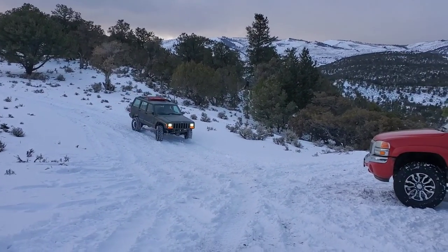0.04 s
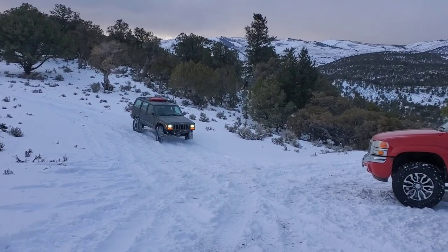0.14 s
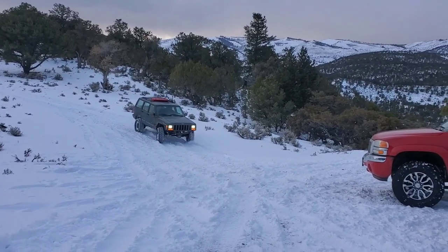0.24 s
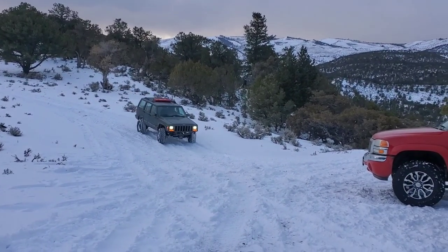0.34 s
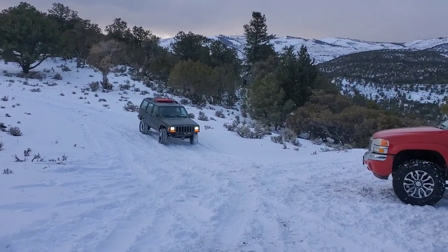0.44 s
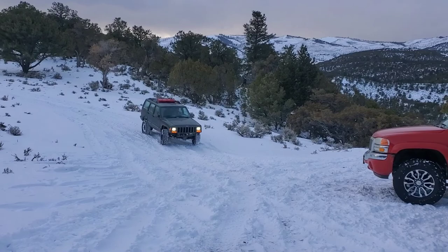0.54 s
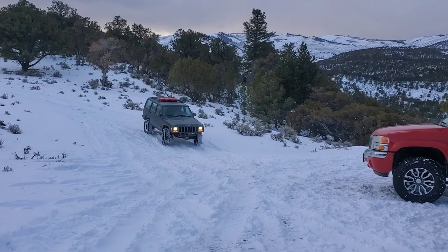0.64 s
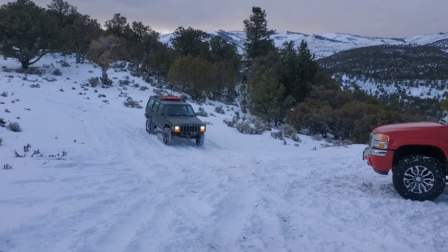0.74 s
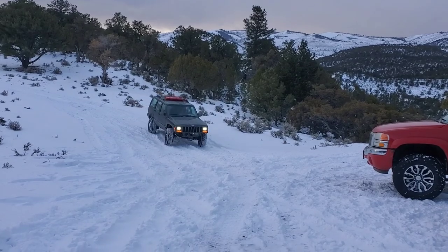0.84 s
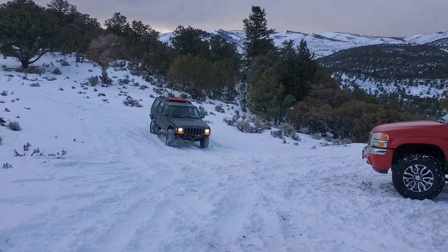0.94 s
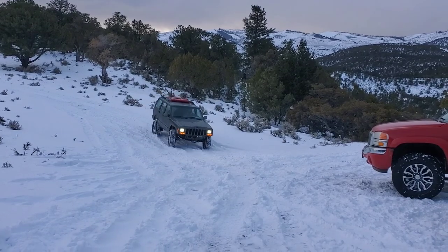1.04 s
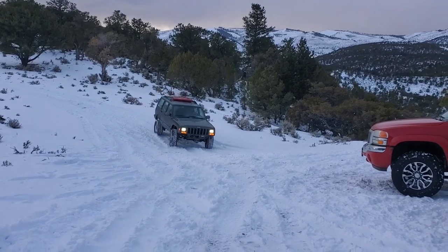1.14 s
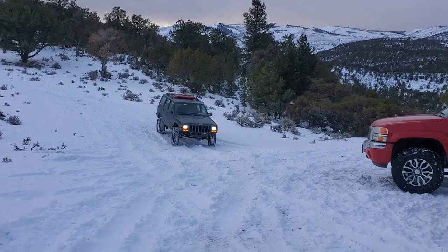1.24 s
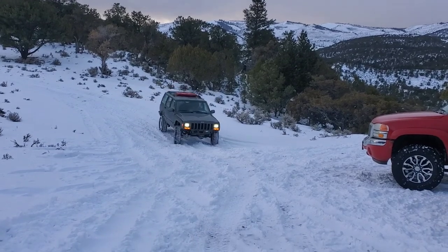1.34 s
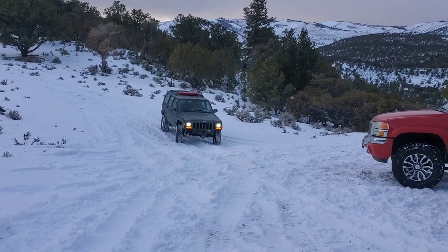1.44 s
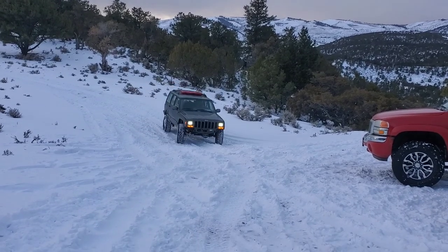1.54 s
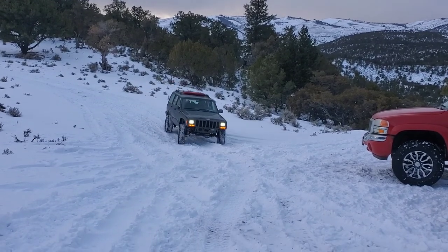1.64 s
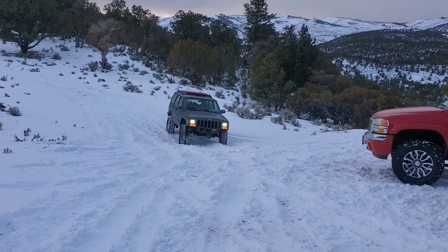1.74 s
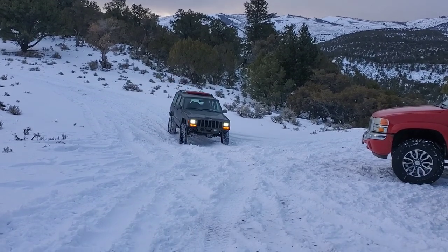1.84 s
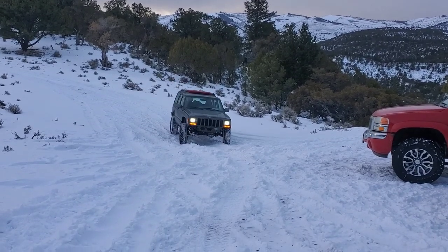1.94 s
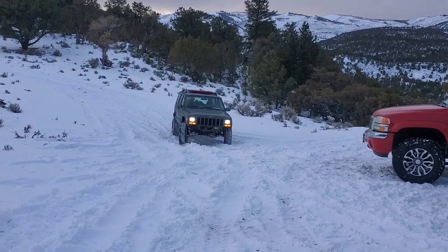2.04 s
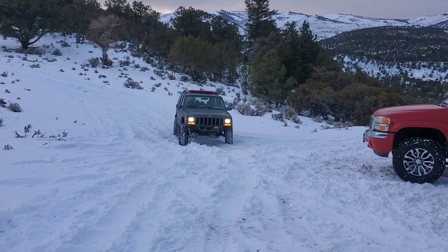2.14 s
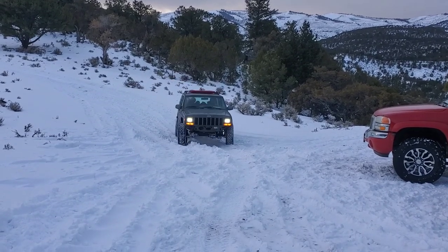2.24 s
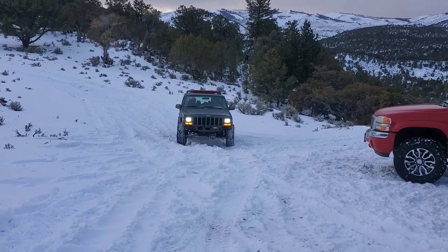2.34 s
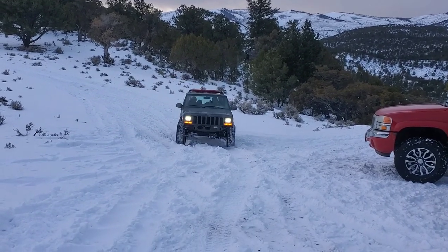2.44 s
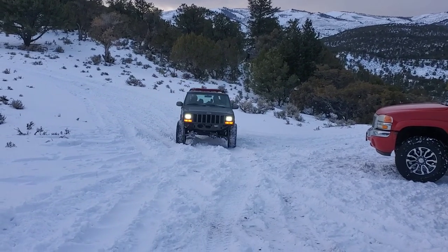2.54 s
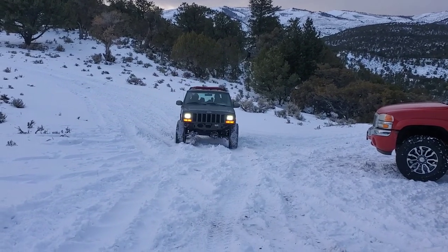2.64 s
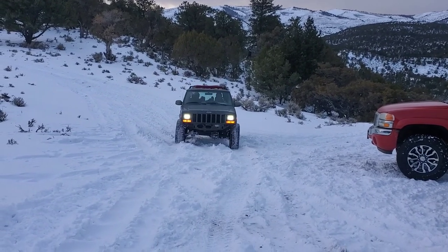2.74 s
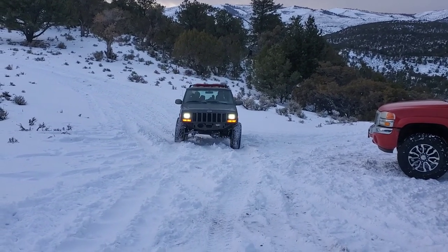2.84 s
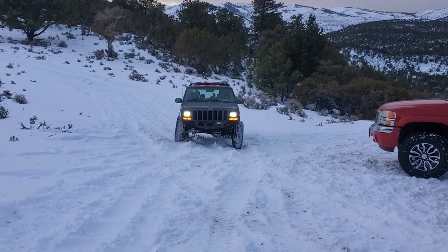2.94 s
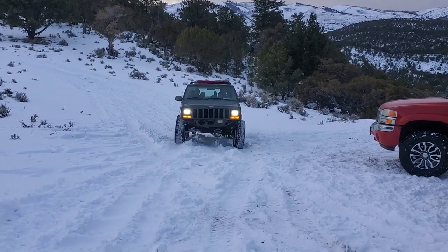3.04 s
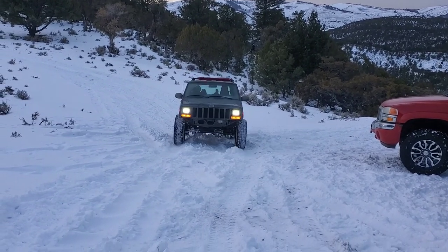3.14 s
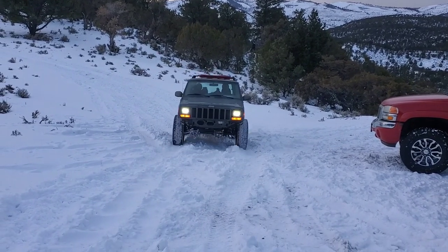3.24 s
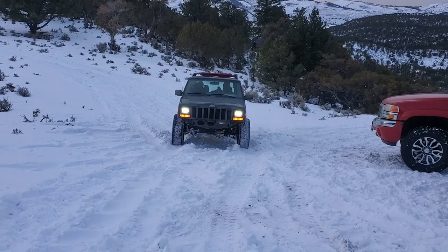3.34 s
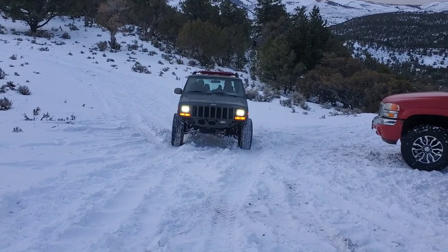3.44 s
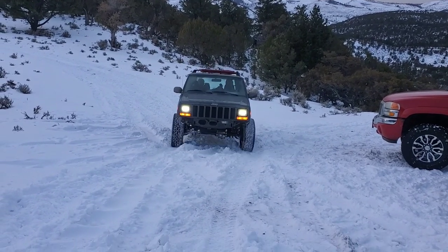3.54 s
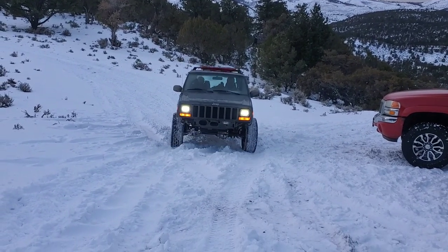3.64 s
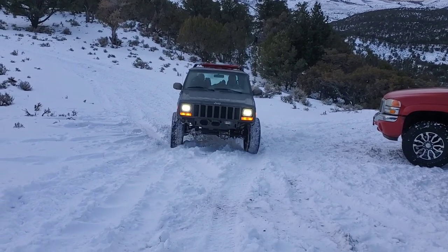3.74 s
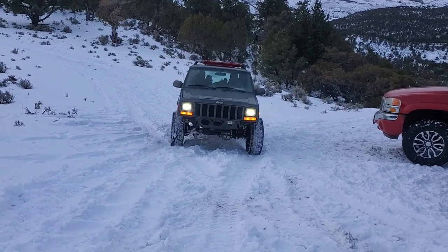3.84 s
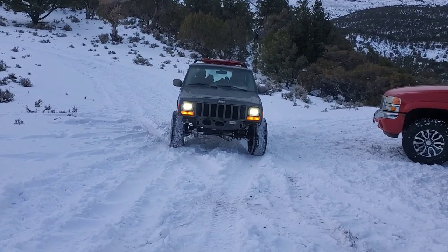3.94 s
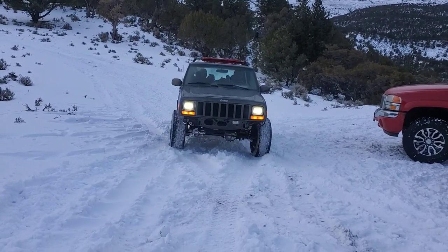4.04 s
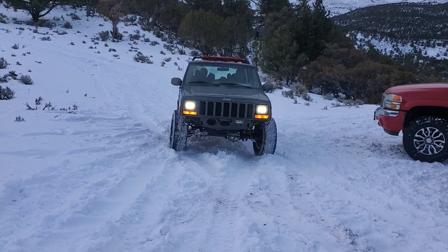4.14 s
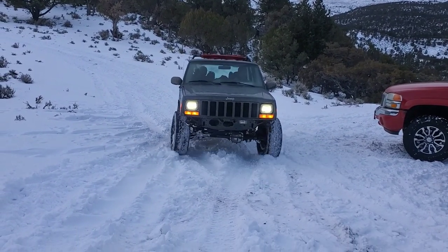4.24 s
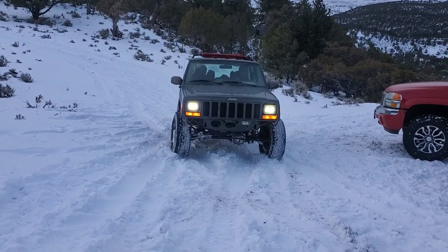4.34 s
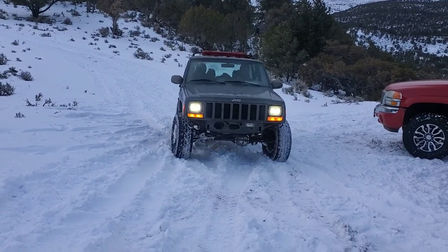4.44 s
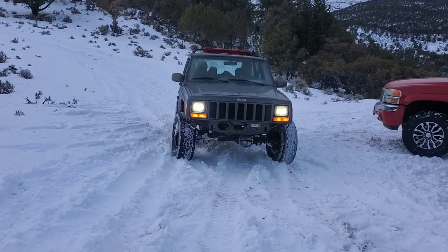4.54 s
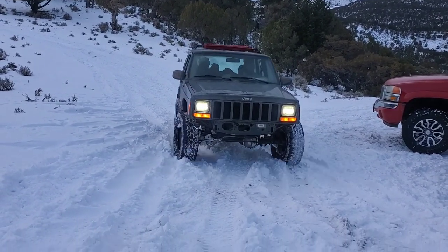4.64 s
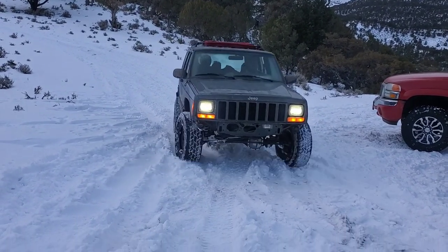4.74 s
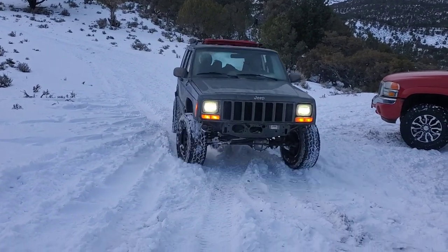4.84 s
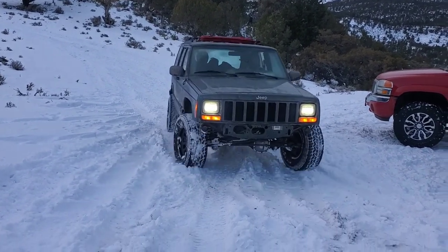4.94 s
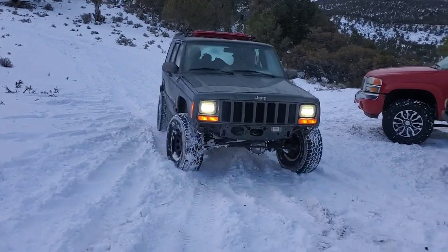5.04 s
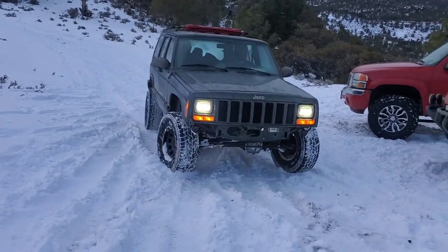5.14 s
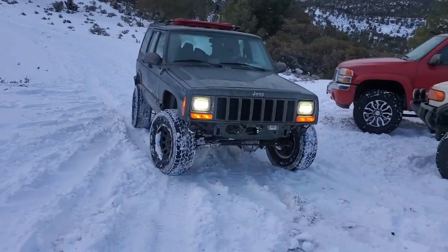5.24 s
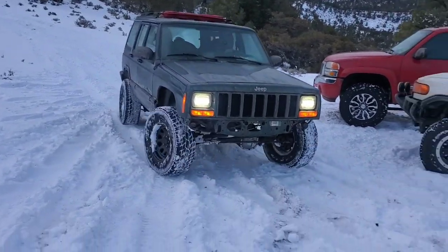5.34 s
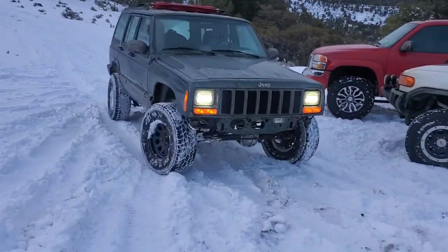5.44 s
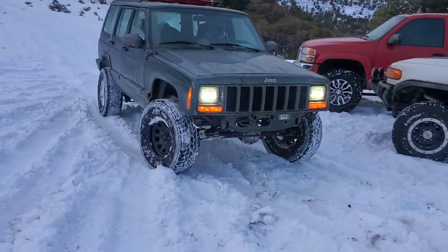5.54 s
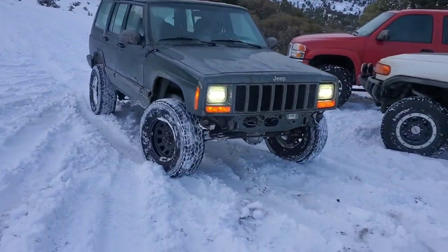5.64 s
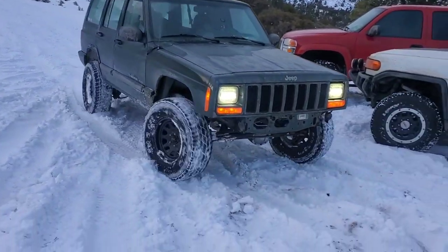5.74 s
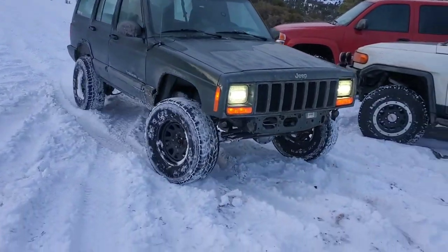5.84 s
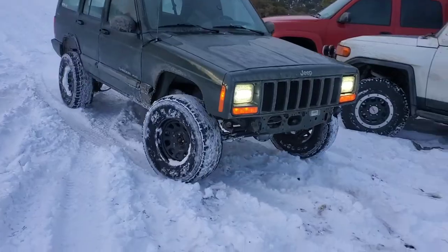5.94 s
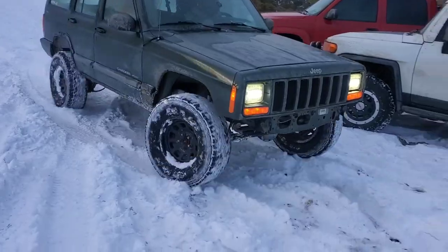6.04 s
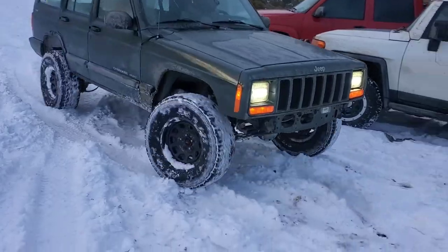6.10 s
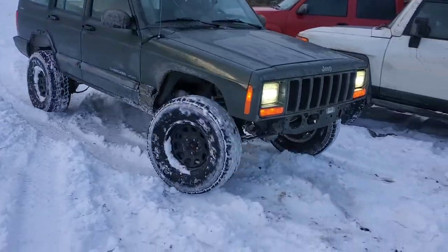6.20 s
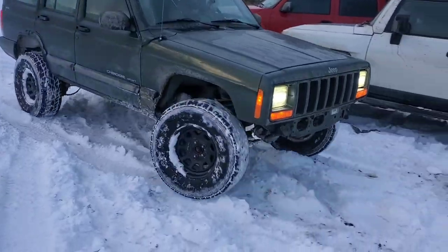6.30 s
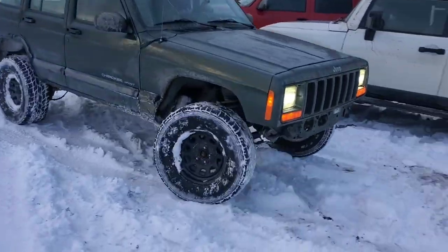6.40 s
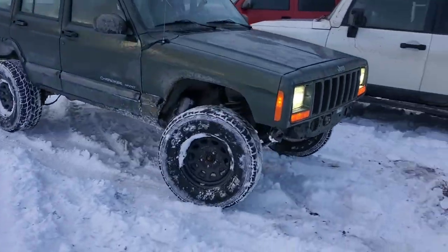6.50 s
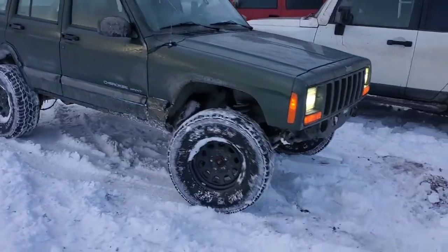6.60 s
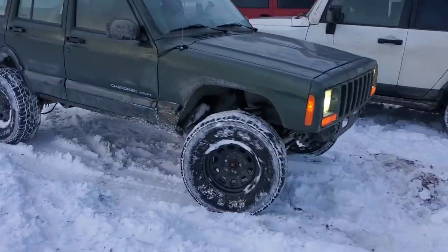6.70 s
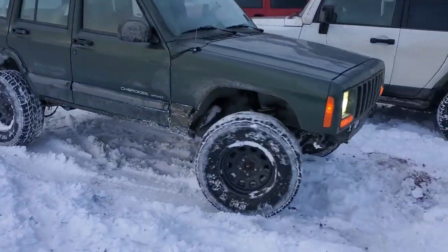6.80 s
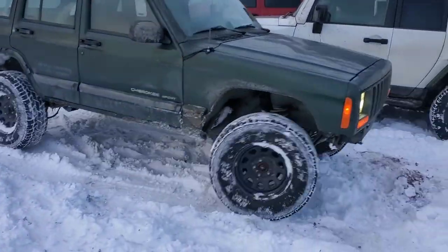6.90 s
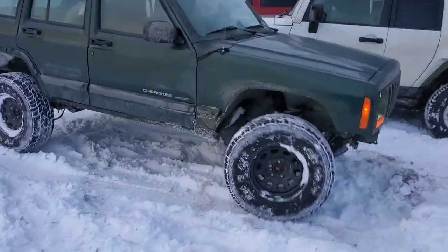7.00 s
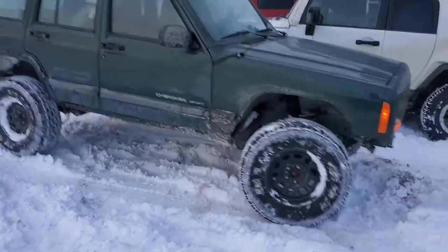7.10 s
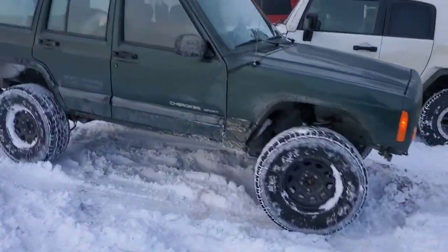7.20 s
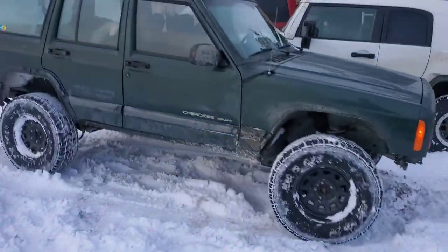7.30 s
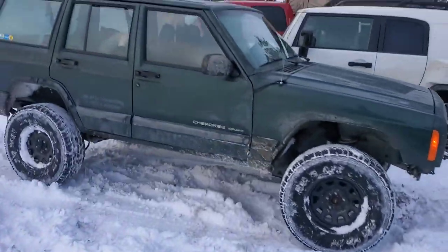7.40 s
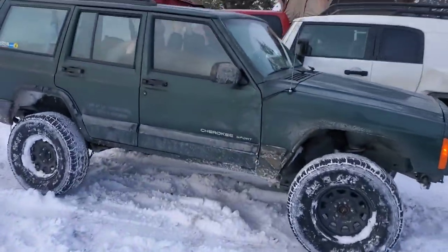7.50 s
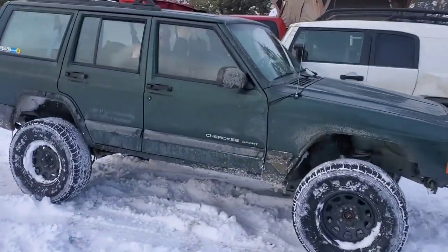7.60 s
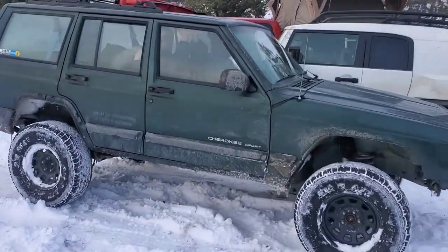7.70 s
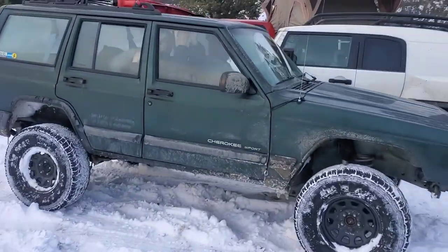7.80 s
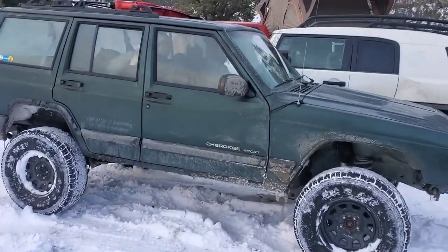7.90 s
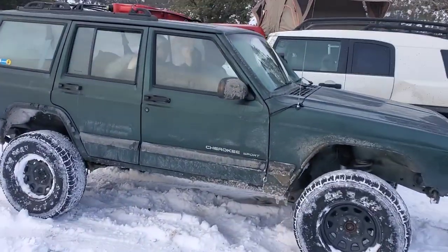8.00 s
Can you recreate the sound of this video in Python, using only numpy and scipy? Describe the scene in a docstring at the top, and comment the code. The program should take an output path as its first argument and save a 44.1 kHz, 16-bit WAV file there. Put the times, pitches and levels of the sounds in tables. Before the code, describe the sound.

A lumpy six-cylinder exhaust booms closer over fizzing snow, fan rushing, then drops abruptly to a low loping idle amid close crunches and dry pops.

```python
"""An exhaust booms and lopes as a six-cylinder four-wheel-drive crawls nearer, then drops to idle passing by.
Its note is a few harmonics of the firing rate; uneven firings ring the exhaust pipe as filtered pulses.
Filtered noise makes the rushing fan, hollow roar and light wind; random clicks on metal resonances tick.
Snow fizzes and packs as shaped noise and clicks; close dull crunches, a knock and dry pops, made of
ringing bursts, sit mostly close to one microphone port. Faint squeaks, a tick and thin whines ring too."""
import sys
import numpy as np
from scipy import signal
from scipy.fft import rfft, irfft
from scipy.io import wavfile

SR = 44100
rng = np.random.default_rng(int(sys.argv[2]) if len(sys.argv) > 2 else 0)


def master(y):
    """Save y as 16-bit WAV."""
    cut = np.clip(np.atleast_2d(y).T, -1, 1)
    pcm = np.round(cut * 32767)  # scale
    wavfile.write(sys.argv[1], SR, pcm.astype(np.int16))


N = 355446
TIME = np.arange(N) / SR

# engine speed: time_s, firings_per_s
ENGINE_SPEED = [(0.0, 69.0), (0.25, 70.7), (0.65, 63.0), (1.05, 73.5), (1.66, 76.0), (2.18, 85.7),
                (2.62, 84.3), (2.85, 77.9), (3.1, 83.7), (3.39, 72.4), (3.7, 67.2), (3.88, 67.4),
                (4.18, 59.4), (4.71, 65.5), (5.12, 63.5), (5.55, 67.5), (5.68, 63.4), (5.95, 47.2),
                (6.08, 42.8), (6.28, 37.8), (6.4, 37.3), (7.21, 37.6), (7.74, 34.6), (8.06, 35.9)]
CRUISE_HZ = 65  # firings per second at cruising speed


def gain_of(db):
    """Turns decibels into amplitude."""
    return 10 ** (np.asarray(db) / 20)


def evened(x):
    """Scales a sound to rms 1."""
    return x / np.sqrt(np.mean(x ** 2) + 1e-20)


def curve(rows, axis=1):
    """Joins one column of a table by straight lines in time."""
    columns = np.transpose(rows)
    return np.interp(TIME, columns[0], columns[axis])


def read(points, hz):
    """Reads a table along a logarithmic frequency axis."""
    f, value = np.transpose(points)
    return np.interp(np.log(hz + 1), np.log(f), value)


def coloured(x, points, size=8192):
    """Gives a sound the listed spectrum with a minimum-phase filter; the result has rms 1."""
    hz = abs(np.fft.fftfreq(size, 1 / SR))
    log_gain = np.log(gain_of(read(points, hz)))
    spectrum = np.exp(np.conj(signal.hilbert(log_gain)))
    response = np.fft.ifft(spectrum).real[:size // 2]
    return evened(signal.oaconvolve(np.atleast_2d(x), response[None], axes=1)[:, :N])


def drift(hz):
    """Makes a random wandering, mostly slower than the given rate, with rms 1."""
    f = np.fft.rfftfreq(N, 1 / SR)
    smoothed = rfft(rng.standard_normal(N)) * np.exp(-(f / hz) ** 2)
    return evened(irfft(smoothed, N))


def noise():
    """Makes two unrelated channels of white noise."""
    return rng.standard_normal((2, N))


def spread(pair):
    """Mixes two unrelated signals into left and right ports: alike in the bass, apart in the treble."""
    # likeness of the two microphone ports: pitch_hz, coherence_0_to_1
    likeness = [(100, .94), (600, .95), (1200, .92), (2200, .72), (4000, .5), (8000, .1)]
    # how far the left port leads the right: pitch_hz, lead_radians
    left_lead = [(150, 0.52), (550, 0.33), (1200, 1.2), (4000, 1.48)]
    (a, b), hz = rfft(pair), np.fft.rfftfreq(N, 1 / SR)
    same = np.clip(read(likeness, hz), 0, 1)
    mid = a * np.sqrt((1 + same) / 2)
    side = b * np.sqrt((1 - same) / 2)
    turn = np.exp(.5j * read(left_lead, hz))
    return irfft(np.array([(mid + side) * turn, (mid - side) / turn]), N)


def grains(per_s, scatter_db):
    """Makes two trains of randomly timed clicks with scattered sizes and either sign."""
    sizes = gain_of(scatter_db * np.minimum(rng.exponential(1, (2, N)), 4))
    signs = rng.choice([-1, 1], (2, N))
    struck = rng.random((2, N)) < per_s / SR
    return evened(sizes * signs * struck)


def swells(rows, order=2):
    """Adds swells (time_s, half_length_s, level_db) as amplitude; a higher order has steeper edges."""
    return sum(gain_of(db) * np.exp(-abs((TIME - s) / half) ** order) for s, half, db in rows)


def resonance(x, hz, width_hz):
    """Rings one narrow band, with gain 1 at its centre."""
    return signal.lfilter(*signal.iirpeak(hz, hz / width_hz, SR), x)


def panned(db):
    """Gives both ports' gains for a left-minus-right level; the nearer port keeps gain 1."""
    return gain_of([[min(db, 0)], [min(-db, 0)]])


def slowing():
    """Counts the octaves by which the engine runs below cruising speed."""
    return np.log2(CRUISE_HZ / curve(ENGINE_SPEED))


def firing():
    """Swings between -1 and 1 once per firing."""
    return np.cos(2 * np.pi * np.cumsum(curve(ENGINE_SPEED)) / SR)


def wind(gust_db=2):
    """Buffets the two microphone ports with lumpy low noise, unrelated between them."""
    # light breeze, strongest near the end: time_s, level_db
    breeze = [(0, -46), (2.2, -43), (4.8, -45), (6.1, -35.5), (8.06, -56)]
    # gusts on top of it: time_s, half_length_s, level_db
    gusts = [(.76, 0.046, -35), (6.58, 0.076, -29), (7.6, 0.61, -28.5)]
    # tone of the buffeting: pitch_hz, level_db
    wind_colour = [(15, -16.5), (40, -6), (72, -1), (130, -11.5), (220, -7.5), (400, -24.5), (1200, -77)]
    lumps = noise() * gain_of(gust_db * np.tanh(drift(hz=9.5)))
    return (gain_of(curve(breeze)) + swells(gusts)) * coloured(lumps, wind_colour)


def hillside(x, level_db=-13.5, t60_s=.2):
    """Scatters a sound back from slope and trees as dense, fading echoes; opposite signs widen it."""
    t = np.arange(SR // 2) / SR
    tail = rng.standard_normal(len(t)) * gain_of(-60 * t / t60_s)
    echo = signal.fftconvolve(x.ravel(), tail / np.linalg.norm(tail))[:N]
    return gain_of(level_db) * np.array([echo, -echo])


def squeaks(width_hz=170):
    """Rings narrow bands with random clicks for faint squeaks, a tick and thin engine-bay whines."""
    # squeaks, tick and whines: time_s, half_length_s, level_db, pitch_hz
    squeak_rows = [(0.318, .005, -57, 3900), (1.648, 0.39, -64, 3750), (7.277, .012, -64, 4270),
                   (7.355, 0.036, -58, 4280), (7.5, .016, -63, 4230), (7.64, 0.4, -71, 2700)]
    out = 0
    for s, half, db, hz in squeak_rows:
        ring = resonance(grains(per_s=2800, scatter_db=-2), hz, width_hz)
        out = out + swells([(s, half, db)]) * evened(ring)
    return out


def powder(lift_db=3, crystal_share=0.52):
    """Breaks ice crystals under the tread in a fine fizz, which jumps up while a tyre slips."""
    # loose snow under the tread, before lift_db: time_s, left_db, right_db
    bed_levels = [(0, -62, -65), (.3, -60, -60), (1.4, -57.5, -64), (2.2, -55.5, -59.5),
                  (5.2, -58.5, -60.5), (7.4, -58.5, -60.5), (7.95, -61, -64)]
    # a slipping tyre sprays snow, before lift_db: time_s, half_length_s, level_db
    sprays = [(.38, 0.12, -58), (.67, 0.068, -54), (.85, 0.057, -55), (1.0, 0.11, -55), (5.1, .05, -59),
              (6.33, 0.2, -61), (6.85, 0.062, -58.5), (7.1, 0.16, -56.5), (7.35, 0.041, -61)]
    # tone of the fizz: pitch_hz, level_db
    powder_colour = [(500, 0.5), (2500, 3), (5000, -2), (6700, -2), (7300, -7.5), (9500, -5.5), (11500, -2),
                     (15800, -2)]
    bed = spread(noise() + crystal_share * grains(per_s=700, scatter_db=3.5))
    spray = spread(noise() + .7 * grains(per_s=1200, scatter_db=3))
    level = gain_of([curve(bed_levels), curve(bed_levels, axis=2)])
    rolling = level * coloured(bed, powder_colour)
    slipping = swells(sprays, order=3) * coloured(spray, powder_colour)
    return gain_of(lift_db) * (rolling + slipping)


def packing(clump_db=8.5, pan_db=10, crumbs_db=-22.5):
    """Packs snow in clumps of small dull slips, mostly to the left; crumbs crackle at the tread's edge."""
    # snow packing under the tyres, before clumping: time_s, level_db
    packing_level = [(0, -53), (4.9, -54), (5.4, -40.5), (6.1, -48), (6.75, -54), (7.05, -39), (7.3, -36.5),
                     (7.9, -45), (8.06, -53)]
    # tone of the dull slips: pitch_hz, level_db
    packing_colour = [(80, -13), (220, 7.5), (300, 1.5), (420, 2), (600, -17), (900, -12), (1600, -35),
                      (3000, -43.5), (7000, -40), (15000, -76)]
    # tone of the crisp crumbs: pitch_hz, level_db
    crumb_colour = [(200, -8), (600, 7.5), (1200, 4), (2500, -4), (5000, -16), (15000, -32.5)]
    slips = coloured(grains(per_s=500, scatter_db=2), packing_colour)
    crumbs = coloured(spread(grains(per_s=450, scatter_db=2)), crumb_colour)
    clumps = gain_of(clump_db * np.tanh(drift(hz=26)))
    return gain_of(curve(packing_level)) * (clumps * slips * panned(pan_db) + gain_of(crumbs_db) * crumbs)


def crunches(rise_s=.0012, width_hz=380):
    """Makes short, dull, hollow crunches, most close to the left port, from ringing bursts of clicks."""
    # close dull crunches: time_s, decay_s, level_db, ring_hz, left_minus_right_db
    crunch_rows = [(5.187, 0.0067, -27.5, 280, 16), (5.411, 0.019, -33.5, 325, 12),
                   (5.464, .02, -34, 298, 10), (5.892, 0.0092, -28, 280, 8), (6.335, 0.025, -34, 300, 16),
                   (6.479, 0.025, -31.5, 360, 13), (6.539, 0.014, -35.5, 470, 4),
                   (6.832, .012, -30, 348, 22), (7.129, 0.011, -26.5, 290, 11),
                   (7.289, 0.016, -27, 400, 19), (7.409, .012, -34, 320, 13), (7.474, .009, -29, 350, 17),
                   (7.508, 0.028, -30.5, 330, 14), (7.663, 0.017, -32, 282, 12),
                   (7.757, 0.0097, -29.5, 420, 16), (7.846, 0.072, -30, 348, 13.5)]
    # tone of the clicks ahead of the ring: pitch_hz, level_db
    crunch_colour = [(80, -14), (230, 1), (420, 0), (600, -9), (1000, -18), (1600, -29), (3000, -37),
                     (7000, -54), (15000, -70)]
    out, t = np.zeros((2, N)), np.arange(SR // 8) / SR
    gravel = coloured(grains(per_s=2500, scatter_db=1), crunch_colour)
    for s, decay_s, db, hz, pan_db in crunch_rows:
        at = round(s * SR) + np.arange(len(t))
        shape = (1 - np.exp(-t / rise_s)) * np.exp(-t / decay_s)
        burst = resonance(np.take(gravel, at, axis=1, mode="wrap") * shape, hz, width_hz)
        # give both channels the energy of the shape at full height
        burst *= np.linalg.norm(shape / shape.max()) / np.linalg.norm(burst, axis=1, keepdims=True)
        inside = at < N
        out[:, at[inside]] += (gain_of(db) * panned(pan_db) * burst)[:, inside]
    return out


def knock(start_s=6.995, swell_s=0.0031, pan_db=-5):
    """Makes one round, hollow knock from a sum of briefly swelling tones."""
    # tones of the knock: pitch_hz, level_db
    knock_tones = [(320, -24), (420, -21), (510, -25)]
    t = np.maximum(TIME - start_s, 0)
    tones = sum(gain_of(db) * np.sin(2 * np.pi * hz * t) for hz, db in knock_tones)
    swell = (t / (2 * swell_s)) ** 2 * np.exp(2 - t / swell_s)  # reaches 1 after twice swell_s
    return panned(pan_db) * tones * swell


def pops(lift_db=3, ring_s=0.00074, click_s=0.00029):
    """Makes each dry pop from a swing or two of a damped ring and a bright noise click."""
    # pops, most close to one microphone port; ring_db is before lift_db:
    # time_s, ring_db, ring_hz, click_db, left_minus_right_db
    pop_rows = [(1.0915, -51, 900, -34, -12), (6.6159, -22, 600, -37, -17), (6.6187, -28, 540, -45, 17),
                (6.8425, -26, 554, -45, 17), (6.8475, -19, 500, -50, 19), (7.0018, -18, 480, -41, -17),
                (7.0434, -34, 900, -34, -17), (7.129, -25, 400, -37, 2), (7.267, -20, 500, -47, 13),
                (7.278, -19, 420, -52, 15), (7.304, -27, 520, -47, 13), (7.4648, -24, 520, -46, 16),
                (7.5905, -28, 520, -50, 14), (7.7142, -25, 477, -57, 15), (7.7554, -25, 520, -46, 8),
                (7.858, -22, 520, -46, 17), (7.9317, -26, 450, -56, 1)]
    out, t = np.zeros((2, N)), np.arange(SR // 50) / SR
    for s, db, hz, click_db, pan_db in pop_rows:
        ring = gain_of(db + lift_db) * np.sin(2 * np.pi * hz * t) * np.exp(-t / ring_s)
        click = gain_of(click_db) * rng.standard_normal(len(t)) * np.exp(-t / click_s)
        start = round(s * SR)
        out[:, start:start + len(t)] += panned(pan_db) * (ring + click)
    return out


def roar(facing_s=4.43, half_s=1.82, level_db=-46):
    """Rings the air in the radiator shroud, swelling while the grille points at the listener."""
    # hollow tone of the shroud: pitch_hz, level_db
    roar_colour = [(300, -23), (460, 0), (560, 2), (750, -5.5), (1200, -37.5)]
    return swells([(facing_s, half_s, level_db)]) * coloured(spread(noise()), roar_colour)


def fan(rush_lift_db=2, flutter_db=1.25, rasp_db=0.5, db_per_octave=8):
    """Rushes air through the radiator, louder at higher engine speed; its hiss pulses with each firing."""
    # fan at cruising speed as the grille nears and turns away; rush_db is before rush_lift_db:
    # time_s, rush_db, hiss_db
    fan_levels = [(0, -51.5, -70), (.5, -46, -63.5), (1.7, -48, -63), (2.9, -43.5, -58.5),
                  (5.1, -43, -52.5), (6.5, -45.5, -55), (8.06, -47.5, -62.5)]
    # tone of the rush: pitch_hz, level_db
    rush_colour = [(150, 3.5), (300, -3), (390, -12), (520, -2.5), (680, -2.5), (930, -8.5), (1150, -5),
                   (1350, -9), (1600, -18), (2400, -25.5), (6000, -67)]
    # tone of the hiss: pitch_hz, level_db
    hiss_colour = [(600, -11), (1400, -13.5), (1750, 0), (2000, -5), (2700, 2.5), (3700, 0), (4600, -6),
                   (6000, -13), (7500, -21.5), (15000, -37.5)]
    flow = gain_of(flutter_db * drift(hz=43.0) - db_per_octave * slowing())
    rush = gain_of(curve(fan_levels) + rush_lift_db) * coloured(spread(noise()), rush_colour)
    hiss_level = gain_of(curve(fan_levels, axis=2) + rasp_db * firing())
    hiss = hiss_level * coloured(spread(noise()), hiss_colour)
    return flow * (rush + hiss)


def clatter(width_hz=140, beat=0.35, wander_s=.0004):
    """Ticks valve gear and belts against ringing metal; each ring comes and goes and wanders in pitch."""
    # ringing metal of the engine bay: pitch_hz, relative_db
    bay_modes = [(1230, 1.5), (1760, 4), (2210, 1.5), (2650, 0), (2920, -4), (3340, -4), (3760, -3.5),
                 (4200, -4), (4820, -9), (5350, -9.5)]
    # ticking, clearest head-on and under load: time_s, level_db
    clatter_level = [(0, -59), (1.5, -58.5), (2.5, -53), (3.6, -56), (4.6, -59), (5.6, -63), (6.1, -66),
                     (8.06, -62)]
    ticks = spread(grains(per_s=600, scatter_db=2) * (1 + beat * firing()))
    ring = 0
    for hz, db in bay_modes:
        strength = gain_of(db + 3 * np.tanh(drift(hz=3)))
        ring = ring + strength * resonance(resonance(ticks, hz, width_hz), hz, width_hz)
    rocked = TIME + wander_s * drift(hz=6)
    wandering = np.array([np.interp(rocked, TIME, side) for side in ring])
    return gain_of(curve(clatter_level)) * evened(wandering)


def reflected(x):
    """Subtracts a close, delayed reflection, carving slowly sliding bands into the sound."""
    # the reflection swells and fades during the approach: time_s, half_length_s, level_db
    bounce_swell = [(2.5, 2.6, -6)]
    # its lag grows as the grille nears: time_s, lag_s
    bounce_lag = [(0, .00183), (3, .00197), (6, .00203)]
    # what it reflects: pitch_hz, level_db
    bounce_band = [(500, -34), (1100, -12.5), (5000, -2.5), (9000, -21)]
    band_gain = gain_of(read(bounce_band, np.fft.rfftfreq(N, 1 / SR)))
    band = irfft(rfft(x) * band_gain, N)
    late = np.array([np.interp(TIME - curve(bounce_lag), TIME, side) for side in band])
    return x - swells(bounce_swell) * late


def exhaust(side_db=-19, hum_hz=189, drone_upper_db=-2, misfire=.25):
    """Makes a note by even firing; strong and weak cylinders ring the pipe between its harmonics."""
    # exhaust pipe and silencer: pitch_hz, relative_db
    pipe = [(20, -56), (38, -5), (62, 5), (95, 1.5), (125, 7), (152, -2.5), (173, 2.5), (192, 5),
            (220, -14), (250, -17.5), (292, -22), (325, -29.5), (380, -31), (700, -68)]
    # each cylinder's pulse against the mean: relative_strength
    cylinders = [-0.081, -0.96, 0.12, -0.57, -0.67, 0.053]
    # strength, sinking as the throttle shuts and growing as the tailpipe nears: time_s, relative_db
    effort_rows = [(0, -29.5), (.32, -24.5), (.72, -23.5), (.87, -21.5), (1.62, -21), (1.93, -18),
                   (2.2, -18), (2.72, -18), (2.97, -15.5), (3.2, -18), (3.86, -17), (4.0, -19),
                   (4.25, -14.5), (4.6, -15), (4.85, -15.5), (5.35, -14), (5.68, -16.5), (5.8, -22),
                   (5.88, -27), (5.98, -36.5), (6.08, -25.5), (6.5, -28), (7.15, -20.5), (8.06, -21)]
    # how the tailpipe passes the three lowest harmonics: pitch_hz, relative_db
    note_colour = [(35, -14.5), (48, -23), (60, -8), (69, 1), (85, 0.5), (112, -4.5), (130, -3.5),
                   (145, -8.5), (170, -16.5), (188, -22.5), (208, -21.5), (255, -29)]
    # a thin engine drone under load: time_s, level_db
    drone_level = [(0, -54), (.7, -48.5), (3.5, -69), (5.3, -49.5), (5.8, -72)]
    # throttle shutting: overtones in the silencer's ring swell: time_s, half_length_s, added_amplitude_db
    overrun_rows = [(5.85, .24, 9)]
    silencer_hz, silencer_width_hz = 183, 19

    hz = curve(ENGINE_SPEED) * (1 + 0.0033 * drift(hz=12.8))
    effort, slow = curve(effort_rows), slowing()
    turns = np.cumsum(hz) / SR  # firings so far
    overrun = swells(overrun_rows)
    # wavering, overtones and uneven firing all grow with each octave of slowing
    waver_db = 1.8 + 1 * slow
    burble_db = effort - 15.5 + 4 * slow
    lope_db = effort - 12 + 12 * slow

    note = burble = 0
    for k in range(1, 9):
        lift = 1 + overrun * np.exp(-((k * hz - silencer_hz) / silencer_width_hz) ** 2)
        if k < 4:
            level = effort + read(note_colour, k * hz) + waver_db * np.tanh(drift(hz=27.4))
            note = note + lift * gain_of(level) * np.cos(2 * np.pi * k * turns)
        else:
            tone = np.cos(2 * np.pi * (k * turns + rng.random()))
            burble = burble + lift * gain_of(read(pipe, k * hz)) * tone
    burble = burble * gain_of(burble_db)

    # two thin lines ride one and two firing rates above a steady hum
    drone = 0
    for k in range(1, 3):
        line = np.sin(2 * np.pi * (hum_hz * TIME + k * turns))
        drone = drone + gain_of((k - 1.5) * drone_upper_db) * line
    drone = drone * gain_of(curve(drone_level))

    fired = np.flatnonzero(np.diff(np.floor(turns)))
    pulses = np.zeros(N)
    chance = misfire * rng.uniform(-0.87, 1, len(fired))
    pulses[fired] = np.resize(cylinders, len(fired)) + chance
    lope = gain_of(lope_db) * coloured(pulses, pipe)

    # below cruising speed the note throbs once per crank revolution (three firings)
    throb = gain_of(2 * np.maximum(slow, 0) * np.cos(2 * np.pi * turns / 3))
    boom = np.sqrt(2) * (throb * (note + burble) + drone) + lope
    # the boom reaches the left port slightly ahead of the right
    lead = gain_of(side_db) * signal.hilbert(boom).imag
    return np.vstack([boom - lead, boom + lead]) + hillside(lope)


def scene():
    """Adds wind, close sounds, snow, engine bay and exhaust together."""
    # the bass drops out briefly: time_s, half_length_s, depth_db
    dips = [(6.529, 0.025, 9.5), (7.323, 0.027, 10.5), (7.389, 0.02, 8.5), (7.889, 0.022, 11)]
    dips_db = sum(depth * np.exp(-((TIME - s) / half) ** 4) for s, half, depth in dips)
    bass = (wind() + exhaust()) * gain_of(-dips_db)
    close_sounds = crunches() + knock() + pops()
    front = reflected(fan() + clatter() + powder()) + roar()
    return bass + squeaks() + packing() + close_sounds + front


def record(dry, edge_hz=15850, fade_s=.005):
    """Limits the treble like a recorder, with a brief fade at both ends."""
    faded = dry * np.clip(np.minimum(TIME, TIME[::-1]) / fade_s, 0, 1)
    lowpass = signal.firwin(511, edge_hz, window=("kaiser", 9), fs=SR)
    return signal.oaconvolve(faded, lowpass[None], "same")


dry = scene()
out = record(dry)
master(out)
```